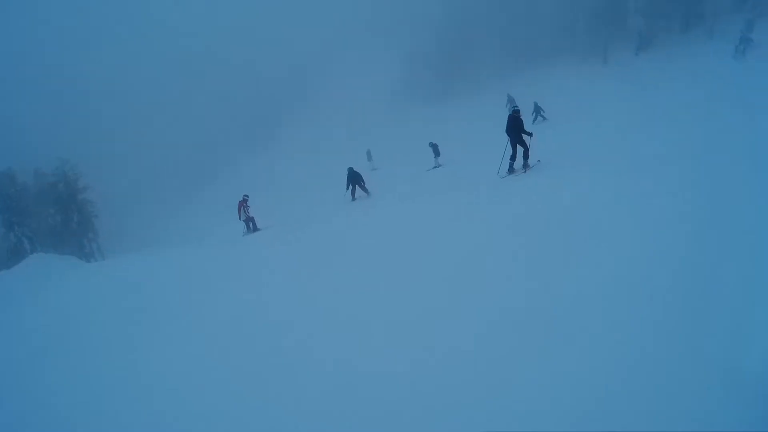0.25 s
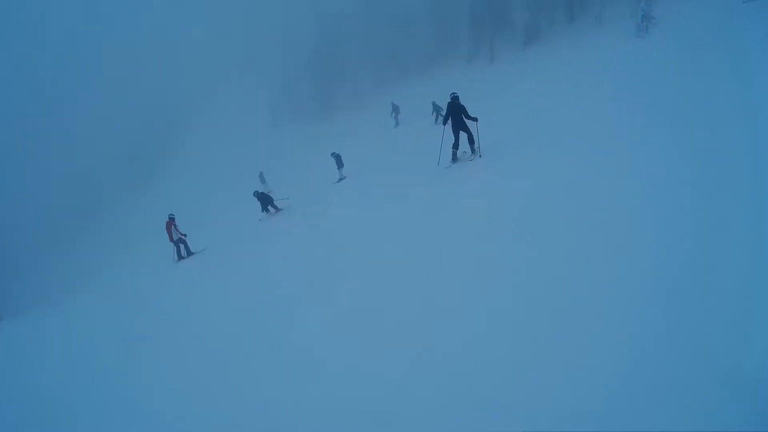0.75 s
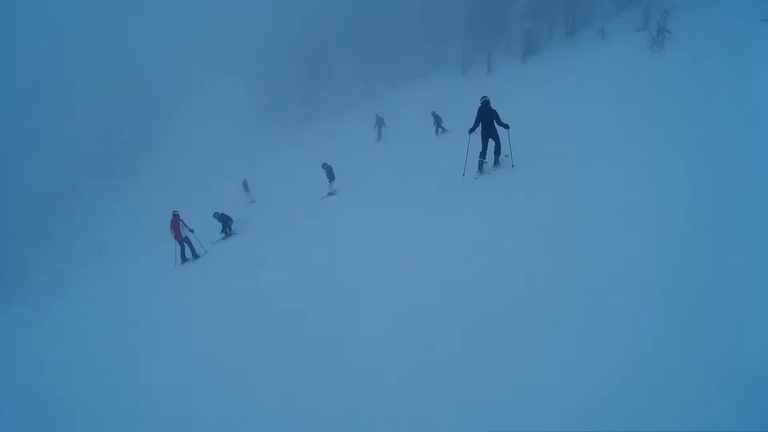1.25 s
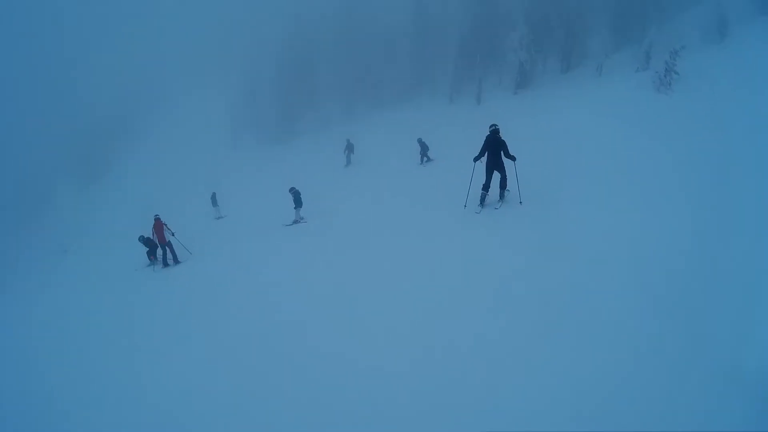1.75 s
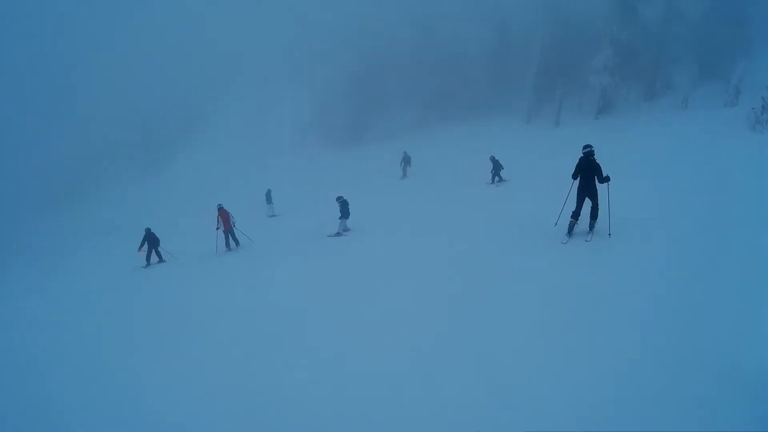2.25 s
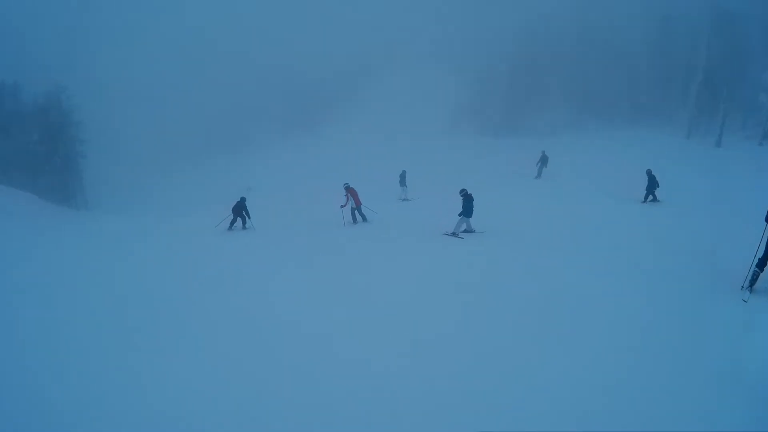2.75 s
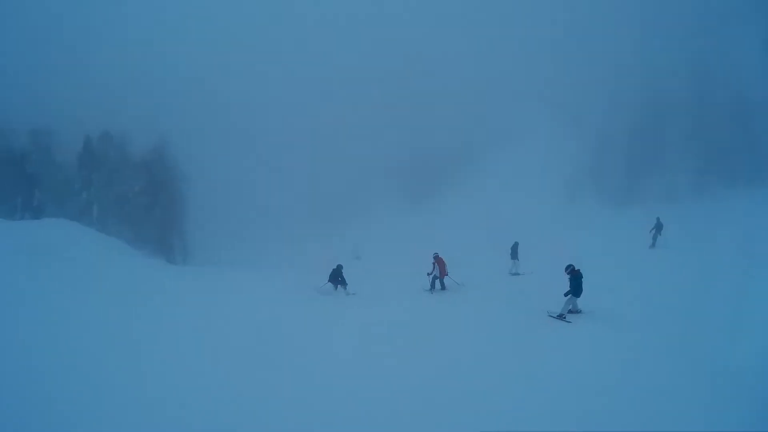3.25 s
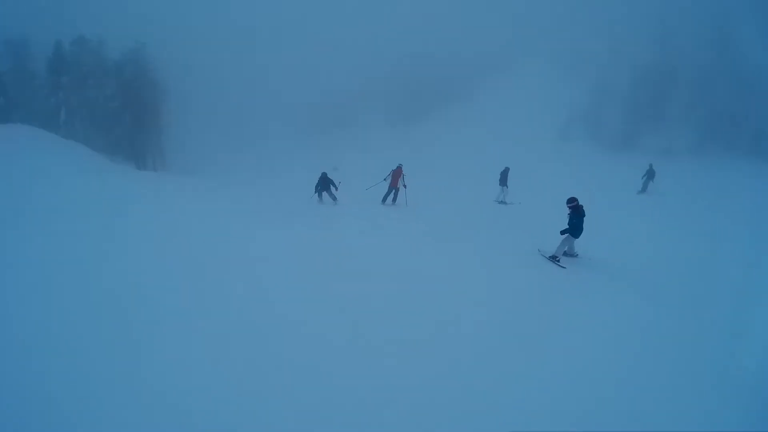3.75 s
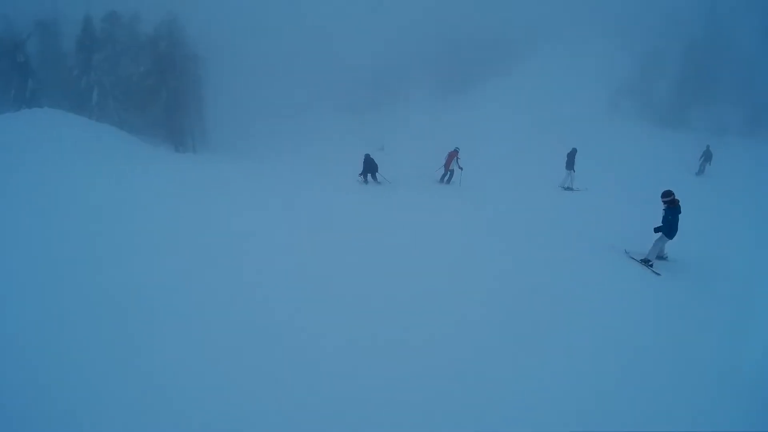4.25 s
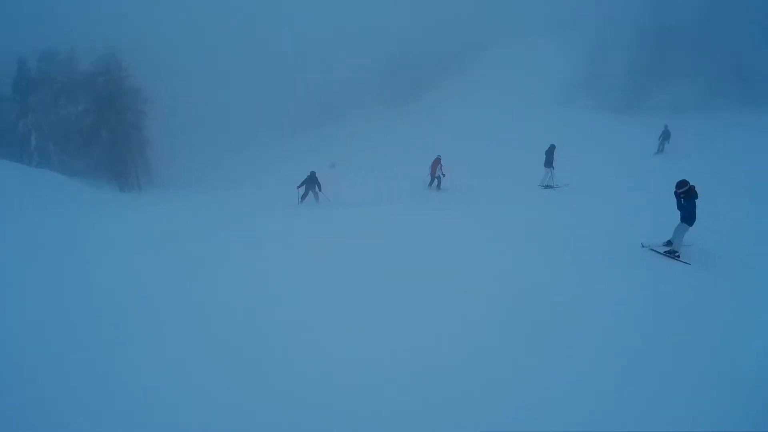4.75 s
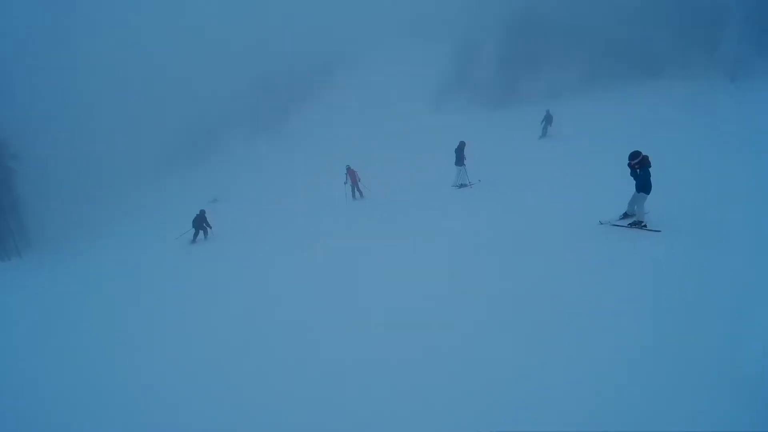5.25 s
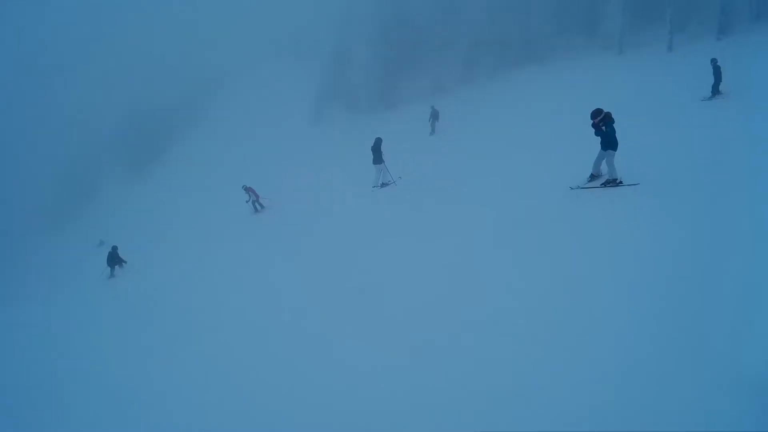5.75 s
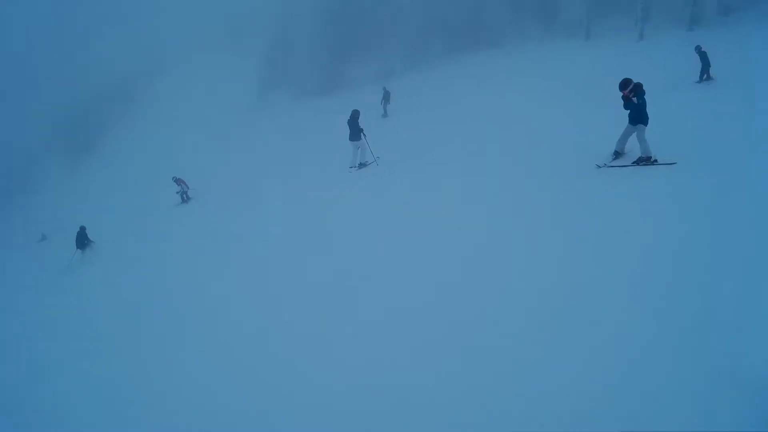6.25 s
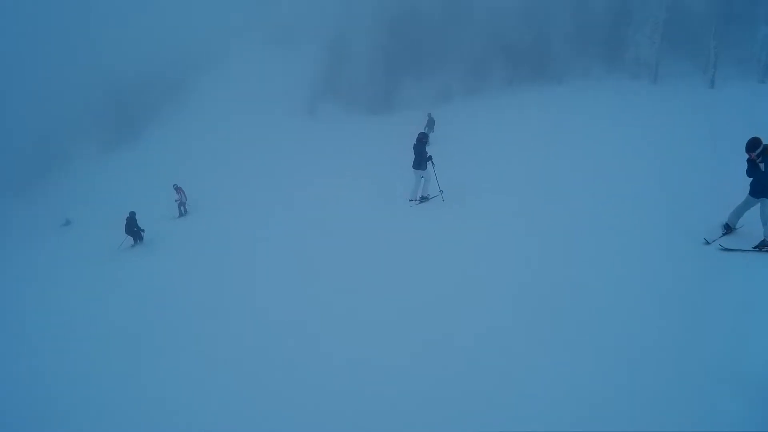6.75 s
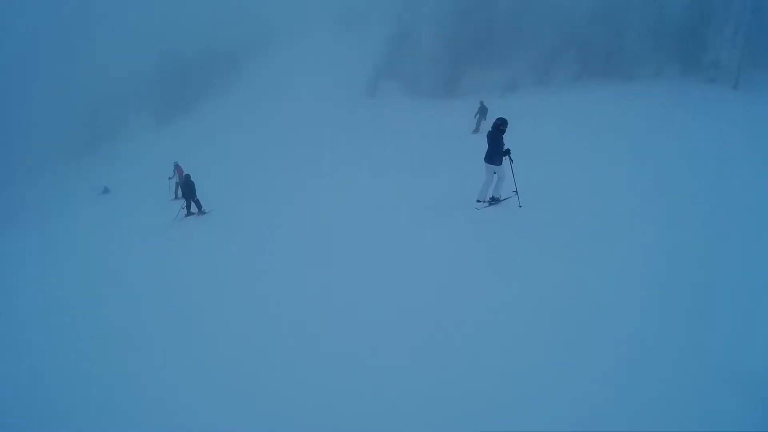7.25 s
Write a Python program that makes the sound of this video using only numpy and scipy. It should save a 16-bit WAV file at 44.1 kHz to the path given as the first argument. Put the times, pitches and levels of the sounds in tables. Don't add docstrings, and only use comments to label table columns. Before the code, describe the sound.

A small microphone in a closed plastic case on a skier gives a close, muffled, boxy sound. Skis grind straight away, strongest around 0.3-0.7 s, with dull thumps and clacks at 0.42 and 0.5 s and the heaviest padded shove at 0.57 s, followed by light ticks. Sharp plastic knocks and short ringing returns come at 1.03-1.25 s. From 1.3 to 2.2 s there is mostly quiet gliding with a weak scrape. A grainy scrape returns at 2.3-2.9 s, a hard clack at 2.87 s, a tiny dropout, then bumps and clacks at 3.1-3.4 s and a soft knock at 3.67 s. Modest scrapes follow, building from 4.6 s to the loudest grinding at 5.5-5.9 s, capped by bright crystal sprays and flicks at 5.65-5.93 s. Grinding eases by 6.5 s, then rises moderately again to the end at 7.5 s. Low gusts buffet over soft hiss.

```python
import sys
import numpy as np
from scipy import signal
from scipy.fft import rfft, irfft
from scipy.io import wavfile
from scipy.ndimage import uniform_filter1d

SR = 44100
rng = np.random.default_rng(int(sys.argv[2]) if len(sys.argv) > 2 else 0)


def int16_out(signal):
    q = np.round(np.clip(np.atleast_2d(signal).T, -1, 1) * 32767)
    wavfile.write(sys.argv[1], SR, q.astype(np.int16))


def to_linear_factor(level_db):
    exponent = np.asarray(level_db, float) / 20
    return 10 ** exponent


N = 330750


def unit(x):
    return x / np.sqrt(np.mean(x ** 2))


def resonance(x, hz, width_hz):
    return signal.lfilter(*signal.iirpeak(hz, hz / width_hz, fs=SR), x)


def through_case(sizes, modes):
    out = np.zeros(N)
    for hz, width_hz, db in modes:
        impacts = sizes * rng.standard_normal(N)
        once = resonance(impacts, hz, 1.5 * width_hz)
        out += to_linear_factor(db) * resonance(once, hz, 1.5 * width_hz)
    return out


def wander(rate_hz):
    hold = int(SR / rate_hz)
    steps = np.repeat(rng.standard_normal(N // hold + 1), hold)
    smooth = uniform_filter1d(uniform_filter1d(steps, hold), hold)
    return unit(smooth[:N])


def crystals(spread_db, patchy_db, patch_hz):
    rarity = np.minimum(rng.exponential(size=N), 7)
    return to_linear_factor(spread_db * rarity + patchy_db * wander(patch_hz))


# start in seconds, end in seconds,
# grinding at the start in dB, grinding at the end in dB, bite of the edges in dB.
TURNS = [(0.153, 0.368, -58.5, -62.5, -2), (0.247, 0.707, -51, -55.5, -2), (0.978, 1.225, -64.5, -64, 0.5),
         (1.432, 1.867, -65, -61, -1.5), (2.257, 2.9, -54.5, -55, -1), (2.85, 3.37, -59.5, -55.5, 1.5),
         (3.5, 3.833, -66.5, -58, 1.5), (4.0, 4.36, -62.5, -61.5, -1), (4.266, 4.614, -60, -54, 1),
         (4.59, 5.58, -57.5, -49.5, -0.5), (5.468, 5.94, -48.5, -45.5, 0), (5.95, 6.524, -52, -58.5, 1),
         (6.55, 6.9, -62, -63.5, -3), (6.9, 7.5, -59, -56.5, -1)]


def ski_load():
    glide_db, load_db_per_s, unload_db_per_s, slew_s = -67.5, 107, 47.5, 0.084
    t = np.arange(N) / SR
    levels = []
    for start, end, first_db, last_db, _ in TURNS:
        loading = glide_db + load_db_per_s * (t - start)
        drift = np.interp(t, [start, end], [first_db, last_db])
        release = unload_db_per_s * np.maximum(t - end, 0)
        levels.append(np.minimum(loading, drift - release))
    grind_db = np.maximum(np.max(levels, axis=0), glide_db)
    bite_db = np.array(TURNS)[np.argmax(levels, axis=0), -1]
    slew = int(slew_s * SR)
    return uniform_filter1d(grind_db, slew), uniform_filter1d(bite_db, slew)


# centre in Hz, width in Hz, level in dB.
BODY_MODES = [(104, 54, -2.5), (166.3, 71, -0.5), (269.5, 76.3, 2), (327.3, 42, -5.5), (506, 280, -16)]
GRIND_MODES = [(812, 82, 0), (1073, 161, 2.5), (1300, 166, 2.5), (1643, 226, -2), (1808, 148, -0.5),
               (624, 266, -8), (930, 520, -11.5)]
EDGE_MODES = [(2270, 800, 0.5), (2950, 440, 1), (3944, 390, 0), (4600, 320, -4.5), (5360, 430, -1.5),
              (6870, 570, -12), (8210, 330, -9), (10100, 1700, -18), (4630, 4900, -14.5)]
# time in seconds, rumble in dB.
GROUND = [(0, 0.5), (.35, -1.5), (.8, 1.5), (1.9, 1.5), (2.3, 0), (2.9, -0.5), (3.3, -3), (3.8, 1),
          (4.1, 3.5), (4.6, -1), (5.1, 1.5), (5.75, 0), (5.85, 0), (6.3, 3), (6.85, 0), (7.02, -5.5),
          (7.2, 3), (7.5, -2.5)]


def skis(grind_db, bite_db):
    load_db = grind_db + 57
    edge_db = -69 + 1.12 * load_db + bite_db
    body_db = -56 + 0.62 * load_db + np.interp(np.arange(N) / SR, *np.transpose(GROUND))
    snow = wander(25)
    grind = unit(through_case(crystals(2.5, 1.0, 60), GRIND_MODES)) * to_linear_factor(grind_db + 0.84 * snow)
    edge = unit(through_case(crystals(1.5, 1.4, 80), EDGE_MODES)) * to_linear_factor(edge_db + 0.97 * snow)
    body = unit(through_case(crystals(0.9, 2.0, 20), BODY_MODES)) * to_linear_factor(body_db + 0.19 * snow)
    return grind + edge + body


def mount_swings(jolts, rise_cycles, sign):
    stiffening = 0.6
    out, t = np.zeros(N + SR), np.arange(SR // 2) / SR
    for s, db, hz, turns in jolts:
        cycles = hz * t + stiffening * (1 - np.exp(-hz * t))
        rise = 1 - np.exp(-(hz * t / rise_cycles) ** 2)
        decay = 1000 ** (-hz * t / turns)
        swing = rise * decay * np.sin(2 * np.pi * cycles)
        out[int(s * SR):][:len(t)] += sign * to_linear_factor(db) * swing / np.abs(swing).max()
    return out[:N]


# start in seconds, peak in dB, settled pitch in Hz, cycles until silent.
THUMPS = [(0.344, -37, 67.6, 2.9), (.5012, -28, 94, 2), (.5095, -29, 37.8, 1.4), (.4200, -24.5, 237, 3),
          (1.0271, -24, 214, 6.4), (1.0272, -26, 300, 1.6), (1.1492, -26.5, 116, 3),
          (2.870, -29, 110, 0.68), (2.8745, -37, 59.4, 2.3), (3.106, -39, 100, 0.78),
          (3.163, -30.5, 105, 5.9), (3.250, -29.5, 69, 1.9), (3.278, -38, 32, 2.9),
          (3.353, -33.5, 114, 3.5), (3.379, -36, 64, 2.8), (5.906, -38.5, 42, 3.9),
          (5.97, -38.5, 40.8, 2.3)]


def thumps():
    return mount_swings(THUMPS, 0.22, -1)


# start in seconds, peak in dB, settled pitch in Hz, cycles until silent.
SHOVES = [
    (.5636, -14, 139, 1.5),
    (0.574, -38, 149, 6),
    (.5668, -32, 420, 1.7),
    (3.096, -29, 97, 2.5),
    (3.669, -37, 215, 5),
]


def shoves():
    return mount_swings(SHOVES, 0.44, -1)


# start in seconds, peak in dB, settled pitch in Hz, cycles until silent.
REBOUNDS = [
    (0.426, -29.5, 205, 2.9),
    (1.085, -37.5, 52.6, 10),
    (1.119, -35, 47, 2.6),
    (1.1945, -35, 340, 7.1),
]


def rebounds():
    return mount_swings(REBOUNDS, 0.22, 1)


# start in seconds, level in dB, contact time in seconds,
# freedom to ring as a factor on the decay.
CLACKS = [(0.4198, -36, 0.00019, 0.71), (0.422, -33, 0.00013, 1.1), (0.5646, -41, 0.00011, 0.67),
          (.567, -39, 0.00017, 1.3), (1.0269, -42, 0.0002, 0.57), (1.0288, -30.5, 0.000076, 1.02),
          (1.148, -38, 0.0016, 0.73), (1.188, -45, .0006, .6), (1.1945, -23.5, 0.00067, 0.43),
          (1.200, -34.5, 0.00063, 0.73), (1.2445, -46, 0.0004, 0.69), (1.247, -45, .0004, 0.67),
          (2.8681, -30, 0.00022, 1.2), (2.8689, -37.5, 0.00012, 1.2), (3.097, -41, .0015, 0.65),
          (3.165, -42, 0.0013, 0.65), (3.25, -44, 0.0013, .6), (3.268, -33.5, 0.00066, 0.58),
          (3.355, -33, 0.0013, 0.74), (3.671, -55, 0.0016, 0.97)]
# pitch in Hz, level in dB, decay by 60 dB in seconds.
CLACK_MODES = [(420, -0.5, 0.014), (553, 8.5, 0.0082), (810, -8, 0.015), (1046, 1.5, 0.033),
               (1330, 3, 0.017), (1613, -4, .022), (1960, 1, 0.016), (2500, 6.5, 0.005), (3050, -6, 0.013),
               (4000, 2, 0.0057), (4750, 4, 0.005), (5750, -2.5, 0.0088), (8400, 3.5, 0.0028),
               (11000, -18, .004)]


def clacks():
    out, t = np.zeros(N + SR), np.arange(SR // 10) / SR
    chance = rng.random((len(CLACKS), len(CLACK_MODES), 2))
    for (s, db, contact, freedom), luck in zip(CLACKS, chance):
        attack = 1 - np.exp(-(2 * t / contact) ** 2)
        for (hz, mode_db, t60), (strength, spot) in zip(CLACK_MODES, luck):
            gain = to_linear_factor(db + mode_db + 3.21 * (strength - 3.0)) / (1 + (hz * contact) ** 3)
            decay = 1000 ** (-t / (t60 * freedom))
            tone = np.sin(2 * np.pi * hz * (1 + 0.06 * (spot - 0.5)) * t)
            out[int(s * SR):][:len(t)] += np.sign(spot - 0.3) * gain * attack * decay * tone
    return out[:N]


# centre in Hz, width in Hz, level in dB.
TICK_MODES = [(4030, 870, -6.5), (5370, 540, -4), (6520, 390, -5), (7600, 2100, -12.5), (10430, 2300, -8.5),
              (12700, 1400, -21)]
HOLLOW_MODES = [(2990, 340, 0.5), (1690, 290, 1.5), (1260, 220, -2)]
# start in seconds, level in dB, hollow ring in dB.
TICKS = [(0.3393, -51.5, -16), (0.503, -61, -12), (0.533, -54, -3), (0.626, -41.5, -19), (0.729, -53, -1),
         (0.743, -50.5, -8), (0.802, -54, -6), (0.815, -48, -5), (2.0384, -56, -8), (2.0578, -58.5, 3),
         (2.299, -55, -8), (2.423, -56, -14), (2.4394, -55, -9), (2.5316, -47, -7), (2.629, -50, -5),
         (2.657, -52, -19), (5.722, -59, 2), (5.768, -48, -9), (5.8074, -50, -12), (5.8292, -51, -8),
         (5.8401, -46, -10), (5.857, -47, -15), (5.874, -41, -14), (5.882, -42, -18), (5.89, -46, -9),
         (5.9065, -46, -7), (5.918, -33.5, -3), (6.474, -51.5, -3), (7.083, -56, -6), (7.383, -56, -14)]
# start in seconds, level in dB, length in seconds, hollow ring in dB.
SPRAYS = [
    (2.413, -71, 0.066, 6),
    (5.303, -63, .15, 1),
    (5.65, -55.5, 0.12, -3),
    (5.777, -44.5, 0.016, -13),
    (5.848, -51.5, 0.12, -2),
    (5.899, -41, .016, -2),
    (5.918, -36, 0.0086, 0.5),
    (5.924, -48, 0.011, -1),
]


def ticks_and_sprays():
    t, touch, hollow = np.arange(N) / SR, np.zeros(N), np.zeros(N)
    ticks = [(s, db, 0.0042, hollow_db) for s, db, hollow_db in TICKS]
    for s, db, length, hollow_db in ticks + list(SPRAYS):
        span = slice(int(s * SR), int((s + 0.3) * SR))
        u = (t[span] - s) / length
        burst = to_linear_factor(db) * np.clip(2.4 * u, 0, 1) * np.exp(-u ** 3)
        touch[span] += burst
        hollow[span] += burst * to_linear_factor(hollow_db)
    sizes = unit(crystals(2.2, 1.2, 300))
    bright = to_linear_factor(5.5) * through_case(touch * sizes, TICK_MODES)
    return bright + to_linear_factor(12.0) * through_case(hollow * sizes, HOLLOW_MODES)


# centre in Hz, width in Hz, level in dB.
EDDIES = [(13.8, 29, -5), (32, 15.2, 1.5), (62.2, 19, -2.5)]
# centre in seconds, level above the steady wind in dB, half length in seconds.
GUSTS = [(0.177, 6.5, .07), (0.393, 8.5, 0.066), (0.59, 12.5, 0.14), (0.91, 8.5, 0.1), (1.08, 12, .07),
         (1.446, 6, 0.19), (1.77, 2.5, .08), (2.304, 7, 0.053), (3.115, 10.5, .07), (3.365, 12.5, 0.061),
         (3.55, 5, .08), (4.55, 3.5, 0.075), (5.0, -4.5, .2), (5.68, 11, 0.065), (6.005, 7, .06),
         (6.357, 7, 0.11), (7.304, 5, 0.079)]


def buffeting(grind_db):
    t = np.arange(N) / SR
    air_db = -58 + 0.5 * (grind_db + 57)
    for s, db, half in GUSTS:
        air_db = air_db + db * np.exp(-((t - s) / half) ** 2)
    return unit(through_case(to_linear_factor(0.44 * wander(5.1)), EDDIES)) * to_linear_factor(air_db)


# frequency in Hz, level in dB per Hz.
HISS = [(1500, 2.5), (4000, -2.5), (9000, -4), (12500, -2), (13500, -5.5), (14000, -7), (14400, -15),
        (14700, -26)]


def hiss():
    hz, db = np.transpose(HISS)
    f = np.fft.rfftfreq(N, 1 / SR) + 1
    colour = to_linear_factor(np.interp(np.log(f), np.log(hz), db))
    return to_linear_factor(-70.5) * unit(irfft(rfft(rng.standard_normal(N)) * colour, N))


def scene():
    grind_db, bite_db = ski_load()
    jolts = thumps() + shoves() + rebounds()
    gear = clacks() + ticks_and_sprays()
    return (skis(grind_db, bite_db) + jolts + gear + buffeting(grind_db))[None]


def low_pass(x):
    return signal.sosfilt(signal.butter(12, 15280, fs=SR, output="sos"), x)


def record(dry):
    dropout_s, half_s, dropout_db = 2.8956, 0.0053, -28
    dip = to_linear_factor(dropout_db * np.exp(-((np.arange(N) / SR - dropout_s) / half_s) ** 2))
    lowpass = signal.ellip(6, 1, 40, 15000, fs=SR, output="sos")
    mix = signal.sosfilt(lowpass, (dry + hiss()) * dip)
    return low_pass(mix)


dry = scene()
out = record(dry)
int16_out(out)
```